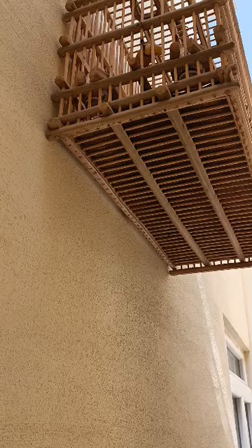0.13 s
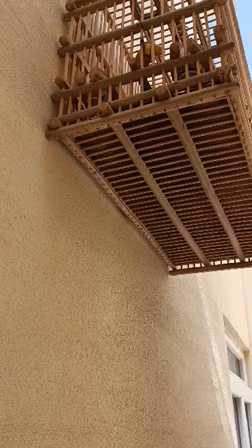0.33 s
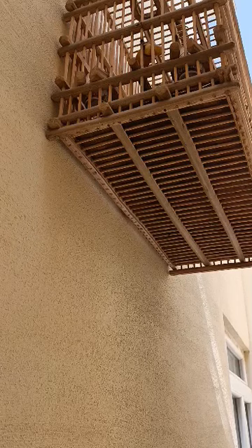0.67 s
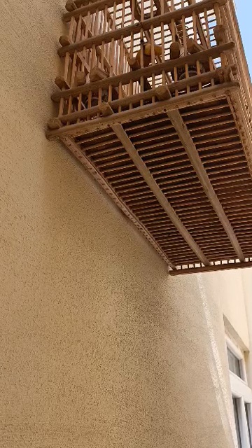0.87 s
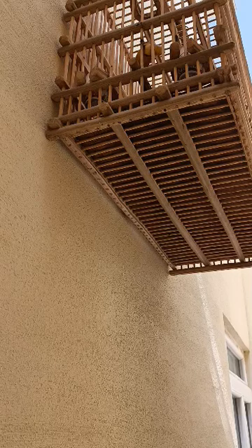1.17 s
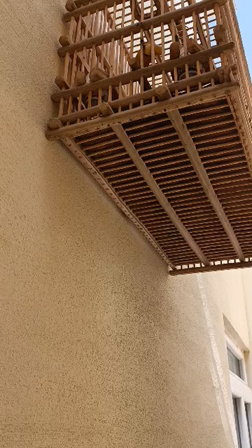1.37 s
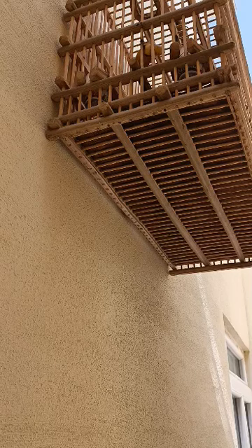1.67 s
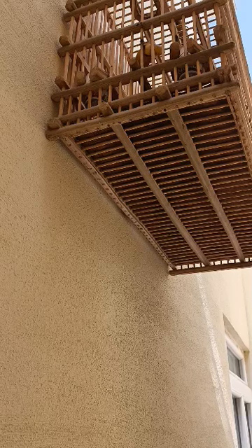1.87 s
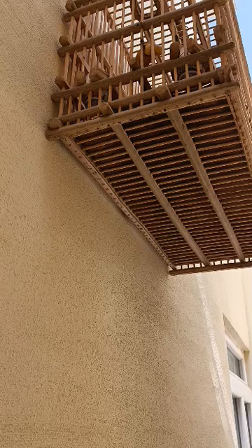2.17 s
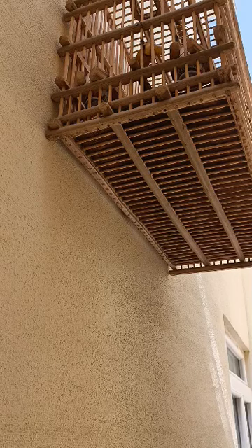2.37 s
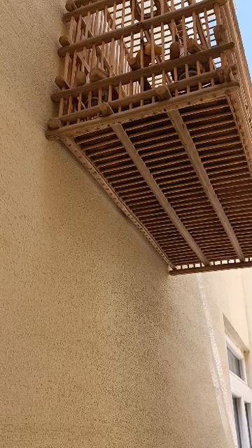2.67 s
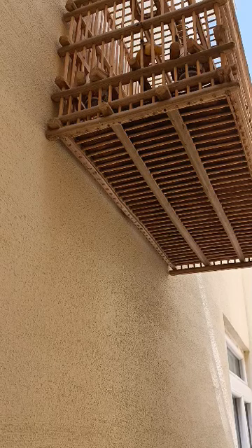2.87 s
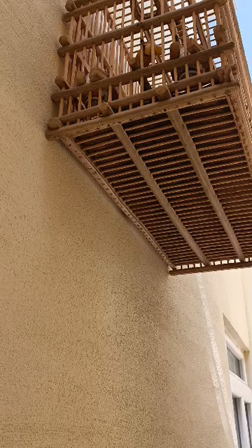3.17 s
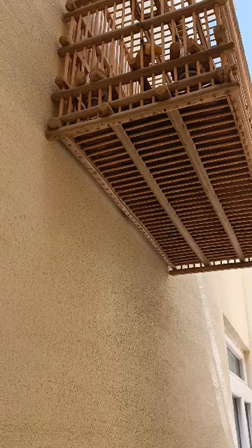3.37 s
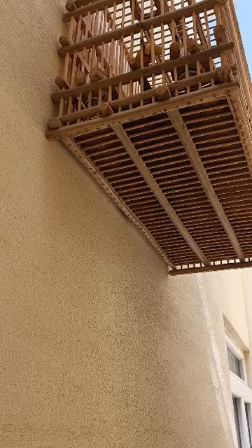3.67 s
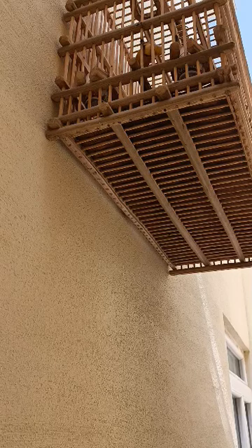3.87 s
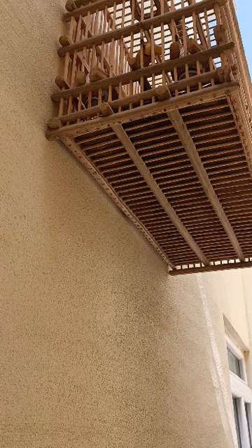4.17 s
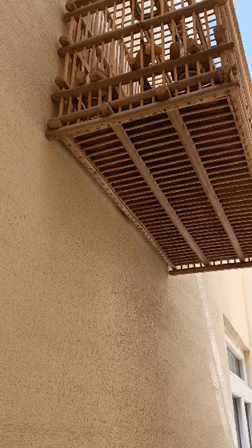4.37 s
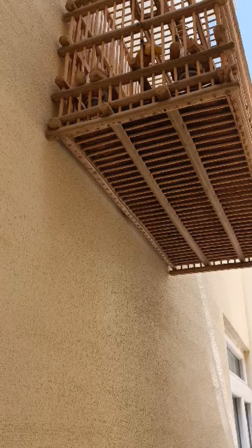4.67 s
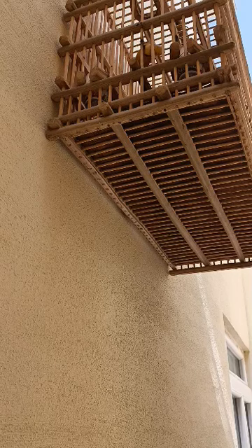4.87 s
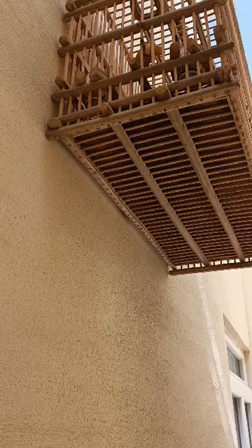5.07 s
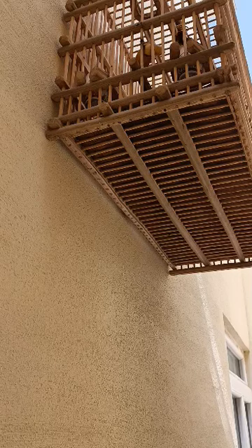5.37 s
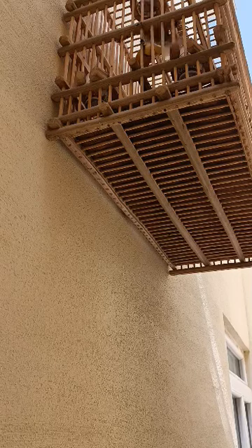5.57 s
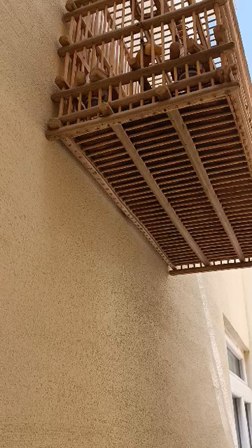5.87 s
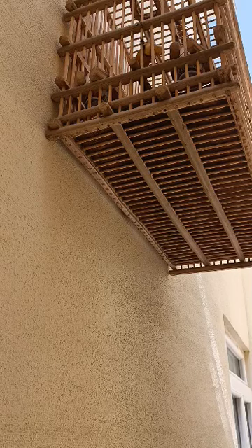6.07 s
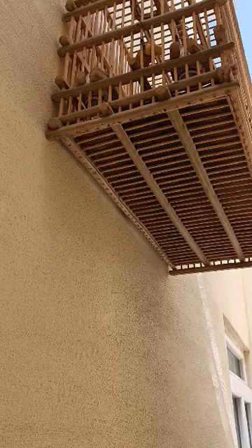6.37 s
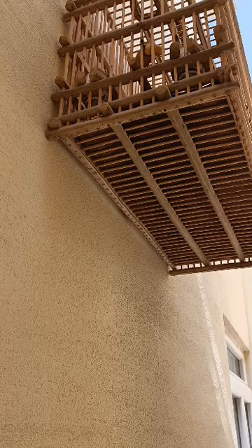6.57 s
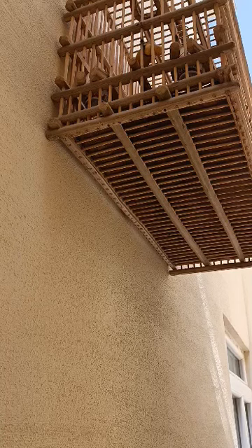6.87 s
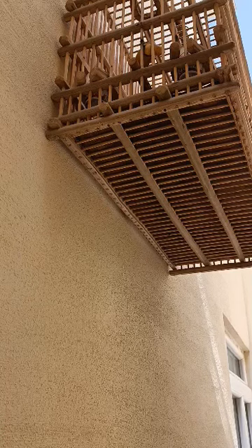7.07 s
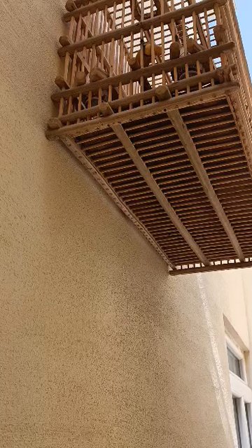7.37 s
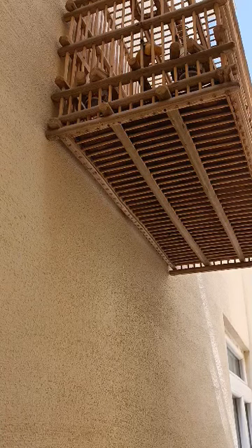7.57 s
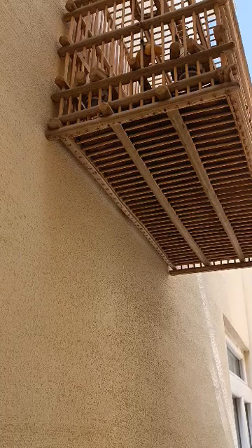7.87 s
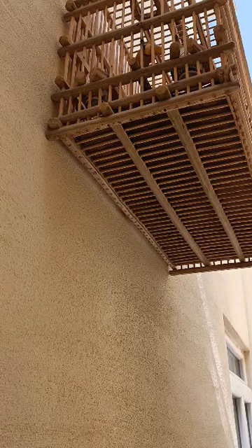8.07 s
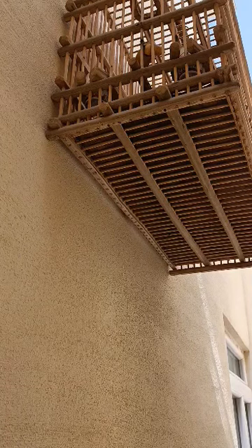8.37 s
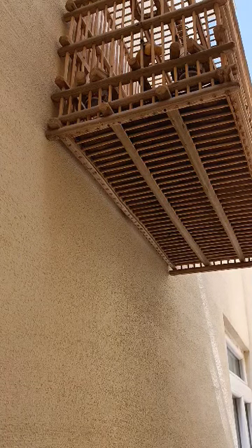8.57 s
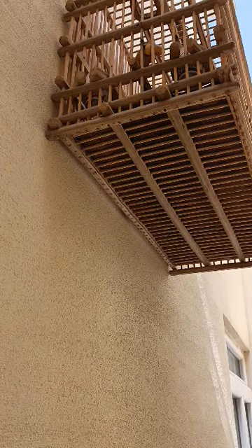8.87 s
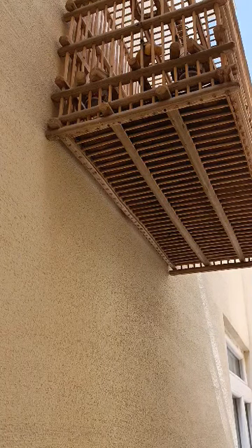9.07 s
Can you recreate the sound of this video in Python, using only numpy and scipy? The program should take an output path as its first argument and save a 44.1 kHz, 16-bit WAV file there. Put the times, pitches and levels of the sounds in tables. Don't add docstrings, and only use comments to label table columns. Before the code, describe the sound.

Outdoors in a hard-walled yard, a caged bird opens with short rasps and chips, then a nasal warble. After a pause come a rasp, a ringing cry and a loud whistled phrase repeated four times, fading. It hops, knocking the wooden cage, warbles again, whistles a liquid run, and ends with rasp, cry and phrase. Faint town rumble and a far engine hum continue; stereo, bird off to the right.

```python
import sys
import numpy as np
from scipy import signal
from scipy.fft import rfft, irfft
from scipy.io import wavfile
from scipy.ndimage import uniform_filter1d

SR = 44100
rng = np.random.default_rng(int(sys.argv[2]) if len(sys.argv) > 2 else 0)


def unload_wav(signal):
    wavfile.write(
        sys.argv[1],
        SR,
        np.round(np.clip(np.atleast_2d(signal).T, -1, 1) * 32767).astype(np.int16),
    )


def ratio(d):
    e = np.asarray(d, float) / 20
    return 10 ** e


N = 406602

# frequency in Hz, gain in dB.
THROAT = [(800, -10.5), (1300, -6), (1750, 4), (2050, 4.5), (2800, 10), (4300, -3), (5300, -30.5),
          (7000, -29.5), (10000, -64.5), (13000, -55.5)]


def at_hz(points, hz):
    table = np.array(points)
    return np.interp(np.log(hz), np.log(table[:, 0]), table[:, 1])


def in_time(rows):
    s, *columns = np.transpose(rows)
    return [np.interp(np.arange(N) / SR, s, column) for column in columns]


def rms_one(x):
    return x / np.sqrt(np.mean(x ** 2) + 1e-20)


def drift(rate, size=N, run_in=20000):
    r = np.exp(-2 * np.pi * rate / SR)
    noise = rng.standard_normal(size + int(run_in))
    return rms_one(signal.lfilter([1], [1, -2 * r, r * r], noise)[int(run_in):])


def band(x, low_hz, high_hz):
    corners = [low_hz, min(high_hz, .45 * SR)]
    return signal.sosfilt(signal.butter(2, corners, "band", fs=SR, output="sos"), x)


def add(out, s, note):
    i = round(s * SR)
    out[i:i + len(note)] += note[:max(N - i, 0)]


def breath(length, rise, swell_db):
    u = np.linspace(0, 1, max(round(length * SR), 8))
    edge = np.clip(np.minimum(u / np.clip(rise, .12, .6), (1 - u) / .18), 0, 1)
    return u, np.sin(np.pi / 2 * edge) ** 2 * ratio(swell_db * (u - 3.0))


def stack(hz, gain_db, count, flutter):
    phase = 2 * np.pi * np.cumsum(hz) / SR
    total = 0
    for k in range(1, count + 1):
        shake = 1 + flutter * (k - .7) * drift(540, size=len(hz), run_in=460)
        level = ratio(gain_db(k, k * hz)) * (k * hz < .4 * SR)
        total = total + level * shake * np.sin(k * phase + rng.uniform(0, 2 * np.pi))
    return total


def town():
    # frequency in Hz, density in dB per Hz.
    rumble = [(15, -45), (25, -22), (86, -4), (123, -5), (325, -14.5), (676, -16), (1300, -22.5),
              (1920, -26), (2630, -29), (3250, -43.5), (3610, -36.5), (7120, -36), (8330, -63.5),
              (9750, -44), (13000, -56)]
    # frequency in Hz, likeness from 0 to 1.
    likeness = [(30, 1), (130, 0.94), (280, 0.78), (610, 0.36), (1330, 0.43), (13000, 0.055)]
    out, edges = 0, 22 * 2 ** np.arange(0, 9.4, .5)
    white = rng.standard_normal((2, 2, N))
    for k, (low, high) in enumerate(zip(edges, edges[1:])):
        mid, side = band(white[k % 2], low, high)
        hz = np.sqrt(low * high)
        alike = np.clip(at_hz(likeness, hz), -1, 1)
        gain = ratio(at_hz(rumble, hz) + 1.5 * drift(2))
        out = out + gain * (np.sqrt(1 + alike) * mid + np.sqrt(1 - alike) * side * [[1], [-1]])
    return ratio(-58) * rms_one(out)


def engine():
    # time in seconds, frequency in Hz.
    firing_hz = [(0, 120.6), (1.5, 119.2), (3.5, 116.3), (5.4, 113.8), (6.6, 111), (9.22, 109.3)]
    # time in seconds, level in dB.
    firing_db = [(0.0, -64), (1.21, -56.5), (1.43, -57), (1.8, -63), (2.7, -57), (2.95, -60), (3.44, -55.5),
                 (4.13, -53.5), (4.8, -60), (5.11, -56.5), (6.03, -57.5), (6.24, -51.5), (6.96, -53),
                 (7.7, -62), (8.04, -67), (8.29, -57.5), (9.04, -52.5), (9.22, -48)]
    # middle in seconds, half width in seconds, peak in dB.
    octave_swells = [(0.361, 0.21, -63), (2.049, 0.38, -65), (2.83, 0.13, -67.5), (3.78, 0.075, -72)]
    (hz,), (tone_db,) = in_time(firing_hz), in_time(firing_db)
    t = np.arange(N) / SR
    octave = ratio(-75.5 + drift(3))
    for middle, half, db in octave_swells:
        octave = octave + ratio(db) * np.exp(-((t - middle) / half) ** 2)
    phase = 2 * np.pi * np.cumsum(hz * (1 + 0.0022 * drift(9.5))) / SR
    tone = ratio(tone_db + 0.66 * drift(6.6)) * np.sin(phase)
    return np.sqrt(2) * (tone + octave * np.sin(2 * phase))


def rasps():
    # start in seconds, length in seconds, start in Hz, top in Hz, level in dB.
    sweeps = [
        (0.08, 0.04, 842, 1420, -36),
        (0.537, 0.045, 897, 1206, -36),
        (2.435, 0.076, 795, 2034, -30.5),
        (7.146, 0.079, 790, 2025, -29.5),
        (8.128, 0.073, 801.4, 1768, -30),
    ]
    # frequency in Hz, gain in dB.
    open_beak = [(800, -14), (1700, -13), (2400, -5), (3300, 0), (4200, -3), (5100, -19), (7000, -30),
                 (13000, -40)]
    climb_hz_per_s = 21000
    broken_s, clear_s = 0.0423, .014
    break_hz, break_depth, break_wobble = 450, 0.76, 0.0834
    hiss_db, roar_db = -23.5, -9.5
    out = np.zeros(N)
    for s, length, start_hz, end_hz, db in sweeps:
        u, air = breath(length, rise=.4, swell_db=-2)
        broken = np.clip((u * length - max(length - broken_s, clear_s)) / .003, 0, 1)
        climb = np.minimum(start_hz + climb_hz_per_s * length * u, end_hz)
        hz = uniform_filter1d(climb, size=400, mode="nearest")
        hz = hz * (1 + break_wobble * broken * drift(break_hz, size=len(u), run_in=400))
        chaos = 1 + break_depth * broken * drift(break_hz, size=len(u), run_in=400)

        def gain_db(k, f):
            return at_hz(open_beak, f) - 13 * (k < 2) - 5 * max(k - 2, 0) * (1 - broken) - 2 * (k > 2)

        voice = stack(hz, gain_db, count=6, flutter=0.08)
        burst = ratio(hiss_db) * broken * rms_one(band(rng.standard_normal(len(u)), 5500, 11000))
        if length > broken_s + clear_s:
            roar = band(band(rng.standard_normal(len(u)), 1500, 5300), 1500, 5300)
            burst += ratio(roar_db) * broken * rms_one(roar)
        add(out, s, ratio(db) * air * (chaos * voice + burst))
    return out


def hiss(song):
    # low edge in Hz, high edge in Hz, level in dB.
    air_bands = [(1000, 4200, -47.5), (2740, 3700, -24.5), (9587, 10400, -38), (11000, 12000, -44)]
    loudness = np.sqrt(uniform_filter1d(song ** 2, size=120).clip(0))
    return loudness * sum(ratio(db) * rms_one(band(rng.standard_normal(N), a, b)) for a, b, db in air_bands)


def chips():
    # start in seconds, length in seconds, pitch in Hz, level in dB, beak resonance in Hz.
    calls = [
        (0.163, 0.02526, 685, -31, 3246),
        (0.627, 0.026, 692, -26.5, 3900),
        (6.057, 0.0286, 793, -32.5, 3730),
        (6.164, 0.033, 870, -29, 4040),
    ]
    out = np.zeros(N)
    for s, length, pitch_hz, db, beak_hz in calls:
        u, air = breath(length, rise=.42, swell_db=1.5)
        hz = pitch_hz * (1 + .03 * drift(200, size=len(u)))
        chop = 1 + 0.39 * np.sin(2 * np.pi * 170 * length * u)

        def gain_db(k, f):
            resonance_db = -np.log1p(((f / beak_hz - beak_hz / f) * 3) ** 2) * 5.34
            return resonance_db + 0.5 * at_hz(THROAT, f) - 5 * (k < 3)

        add(out, s, ratio(db) * air * chop * stack(hz, gain_db, count=16, flutter=0.35))
    return out


def warble():
    # start in seconds, length in seconds, top in Hz, level in dB.
    climbs = [(1.085, 0.024, 1613, -29.5), (1.268, 0.029, 1553, -29.5), (1.552, 0.031, 1492, -29.5),
              (1.689, 0.019, 1348, -31.5), (5.436, 0.034, 1557, -36), (5.602, .035, 1519, -33.5),
              (5.693, 0.034, 1560, -33.5), (6.293, 0.022, 1563, -29.5), (6.577, 0.022, 1375, -33.5),
              (6.779, 0.036, 1554, -30), (6.923, 0.028, 1495, -29.5)]
    # start in seconds, length in seconds, start in Hz, level in dB.
    sags = [(1.432, 0.027, 1412, -29), (6.579, 0.038, 1306, -33.5), (6.701, 0.035, 1154, -35.5)]
    # start in seconds, length in seconds, start in Hz, end in Hz, level in dB.
    glides = [(0.756, .04, 1148, 1639, -37.5), (0.84, .036, 1160, 1840, -28.5),
              (0.863, 0.024, 1823, 1395, -29.5), (0.924, 0.018, 1130, 1467, -34),
              (0.971, 0.047, 1250, 1122, -34.5), (1.005, .028, 1180, 1312, -31),
              (1.028, 0.033, 1374, 1005, -36), (1.156, .05, 1335, 1137, -32),
              (1.16, 0.044, 1136, 1248, -33), (1.339, 0.043, 1000, 1116, -35.5),
              (1.343, 0.013, 1144, 1520, -30.5), (1.377, 0.027, 1146, 1596, -30.5),
              (1.766, 0.025, 905, 1101, -35), (1.997, 0.014, 1170, 1320, -30.5),
              (5.787, 0.038, 1416, 1272, -34), (5.892, 0.0142, 1406, 1158, -32),
              (5.912, 0.011, 1218, 1352, -32), (5.99, 0.016, 1322, 1048, -35),
              (5.998, 0.026, 1090, 1253, -36), (6.129, 0.029, 1164, 1555, -33.5),
              (6.389, 0.036, 874, 1304, -33), (6.494, 0.0185, 1047, 1203, -34),
              (6.51, 0.022, 950, 917.7, -37)]
    # start in seconds, length in seconds, start in Hz, end in Hz, level in dB.
    pure = [(1.856, 0.011, 1216, 1074, -33), (1.862, 0.021, 1435, 1533, -25),
            (1.888, 0.03, 1519, 1462, -28), (1.91, 0.017, 1292, 1231, -32), (2.004, 0.031, 1460, 1524, -30),
            (6.312, 0.015, 1513, 1540, -41), (6.637, 0.018, 1505, 1446, -27),
            (6.828, 0.02, 1510, 1316, -28)]
    rest_hz, sag_to = 1016, .86
    even_db, pure_loss_db = 0, -5
    rough_wobble, clear_wobble = .02, .004
    glide_share = .75
    notes = [(s, length, rest_hz, hz, db, even_db, clear_wobble) for s, length, hz, db in climbs]
    notes += [(s, length, hz, sag_to * hz, db, even_db, rough_wobble) for s, length, hz, db in sags]
    notes += [(*row, even_db, rough_wobble) for row in glides]
    notes += [(*row, pure_loss_db, clear_wobble) for row in pure]
    out = np.zeros(N)
    for s, length, start_hz, end_hz, db, pure_db, wobble in notes:
        tilt_db = 1.1 + 1.1347 * (db + 32) - 0.5 * (s > 4)
        u, air = breath(length, rise=0.18, swell_db=4)
        left = np.clip(1 - u / glide_share, 0, 1) ** 1.3
        hz = (end_hz + (start_hz - end_hz) * left) * (1 + wobble * drift(300, size=len(u)))

        def gain_db(k, f):
            return at_hz(THROAT, f) + tilt_db * (k - 2) + pure_db * abs(k - 2)

        add(out, s, ratio(db) * air * stack(hz, gain_db, count=9, flutter=0.22))
    return out


def cries():
    # start in seconds, level in dB.
    calls = [
        (2.659, -21),
        (8.351, -20),
    ]
    # time in seconds, pitch in Hz, level in dB.
    course = [
        (0, 2260, -17),
        (.01, 3044, -2),
        (.03, 3246, 1.5),
        (0.037, 4176, -1),
        (.047, 3488, 3.5),
        (0.066, 3350, -3),
        (.092, 3162, -3.5),
        (.1, 3033, -35),
    ]
    wobble, flutter = .035, 0.57
    grit_db, grit_fade_s = -4.5, 0.01825
    overtones_db = (0, -27.5, -34, -53.5)
    at, pitch_hz, shape_db = np.transpose(course)
    t = np.arange(round(at[-1] * SR)) / SR
    out = np.zeros(N)
    for s, db in calls:
        hz = np.interp(t, at, pitch_hz) * (1 + wobble * drift(400, size=len(t), run_in=430))
        voice = stack(hz, lambda k, f: overtones_db[k - 1], count=4, flutter=flutter)
        pulses = rng.standard_normal(len(t)) * (rng.random(len(t)) < 900 / SR) * (t > .008)
        grit = ratio(grit_db) * np.exp(-t / grit_fade_s) * rms_one(band(pulses, 1830, 4000))
        air = ratio(db + np.interp(t, at, shape_db)) * np.clip(t / .004, 0, 1)
        add(out, s, air * (voice + grit))
    return out


def whistles():
    # seconds after its start, start in Hz, middle in Hz, end in Hz, level in dB.
    phrase_notes = [(-.002, 2780, 2535, 2503, -14), (0.069, 2335, 1715, 2650, -32.5),
                    (0.08, 2615, 2526, 2397, -14.5), (0.104, 2502, 2411, 2447, -16),
                    (0.228, 1956, 1618, 1656, -28), (0.264, 1875, 2085, 2080, -19),
                    (.312, 1840, 2067, 2227, -35), (0.359, 1681, 1713, 1648, -25)]
    # seconds after its start, start in Hz, middle in Hz, end in Hz, level in dB.
    phrase_flicks = [(.026, 2314, 2077, 2680, -24.5), (0.075, 3220, 3430, 3585, -27),
                     (0.171, 1510, 1813, 2240, -34.5), (0.22, 1630, 1878, 2022, -24),
                     (.255, 1400, 1600, 1950, -35.5), (.292, 2127, 1735, 1267, -29.5),
                     (.384, 1615, 1702, 1600, -27.5)]
    # start in seconds, slowing (1 = none), pitch factor, gain of opening in dB, of the rest in dB.
    repeats = [
        (2.844, 1, 1, 0, 0.5),
        (3.277, 1.062, 0.996, -2, -1.5),
        (3.748, 1.073, 1, -2.5, -4.5),
        (4.231, 1.067, 0.98, -4.5, -5),
        (8.553, 1.01, 1.001, -2.5, 0.5),
        (8.99, 1.035, 0.99, -1, -3.5),
    ]
    # start in seconds, start in Hz, middle in Hz, end in Hz, level in dB.
    run = [(7.412, 2000, 1941, 1820, -21), (7.433, 1890, 1712, 2120, -24.5), (7.521, 2590, 1644, 1680, -26),
           (7.569, 1732, 2230, 1980, -17.5), (7.584, 1770, 2000, 2340, -24), (7.603, 2590, 2473, 2470, -16),
           (7.722, 1687, 2004, 1261, -24), (7.779, 2585, 2373, 2370, -19), (7.809, 1488, 1854, 1790, -22.5)]
    # start in seconds, start in Hz, middle in Hz, end in Hz, level in dB.
    run_flicks = [(7.711, 2460, 2174, 1690, -19), (7.838, 1727, 2230, 2668, -20)]
    # multiple of the pitch, level in dB.
    overtones = [(2, -30.5), (3, -39), (4, -38), (5, -61)]
    notes = [(0.0258, *row) for row in run] + [(0.021075, *row) for row in run_flicks]
    phrase = [(0.0287, *row) for row in phrase_notes] + [(.013, *row) for row in phrase_flicks]
    for s, slowing, factor, *gains_db in repeats:
        for length, t, a, b, c, db in phrase:
            gain = gains_db[int(t > .06)]
            notes.append((length * slowing, s + t * slowing, a * factor, b * factor, c * factor, db + gain))
    level = dict([(1, 0)] + list(overtones))
    out = np.zeros(N)
    for length, s, start_hz, middle_hz, end_hz, db in notes:
        u, air = breath(length, rise=0.25, swell_db=1.0)
        bend = 4 * u * (1 - u) * (middle_hz - (start_hz + end_hz) / 2)
        hz = start_hz + (end_hz - start_hz) * u + bend
        add(out, s, ratio(db) * air * stack(hz, lambda k, f: level[k], count=5, flutter=0.24))
    return out


def cage():
    # time in seconds, click in dB, thud in dB.
    hops = [(5.276, -76.5, -71), (5.3942, -53, -71), (5.4073, -61, -59), (5.4303, -72, -72),
            (5.585, -68, -71), (5.617, -54, -52), (5.686, -43, -38.5), (5.6995, -47.5, -39),
            (5.8966, -63.5, -54), (6.0555, -79, -68.5)]
    # start in seconds, length in seconds, rustle in dB, rattle in dB.
    shakes = [
        (5.26, 0.31, -62, -60),
        (5.583, 0.12, -57.5, -61),
        (5.678, 0.37, -57, -45.5),
    ]
    # frequency in Hz, level in dB, decay time (60 dB) in seconds.
    modes = [(194, -29, 0.1), (294, -8.5, 0.0293), (454, -14, 0.055), (577, 10.5, 0.0068),
             (790, -15, 0.013)]
    rise_s, fade_db_per_s = 0.031, 10
    ticks, thuds = np.zeros(N), np.full(N, 1e-18)
    for s, click_db, thud_db in hops:
        add(ticks, s, ratio(click_db + 20.0) * rng.standard_normal(260) * np.exp(-np.arange(260) / 50))
        thuds[round(s * SR)] = ratio(thud_db - 6.5)
    rustle, rattle = np.zeros((2, N))
    for s, length, rustle_db, rattle_db in shakes:
        t = np.arange(round(length * SR)) / SR
        shake = np.clip(np.minimum(t, length - t) / rise_s, 0, 1) * ratio(-fade_db_per_s * t)
        add(rustle, s, ratio(rustle_db) * shake)
        add(rattle, s, ratio(rattle_db) * shake)
    strikes = rng.random(N) < 2500 / SR
    grains = rms_one(rng.standard_normal(N) * ratio(4.1 * rng.exponential(1, N)) * strikes)
    thuds += ratio(-34.5) * rattle * grains
    out = band(ticks + ratio(3.5) * rustle * grains, 1200, 8000)
    for hz, db, t60 in modes:
        r, w = ratio(-60 / (t60 * SR)), 2 * np.pi * hz / SR
        out += ratio(db) * signal.lfilter([0, np.sin(w)], [1, -2 * r * np.cos(w), r * r], thuds)
    return out


def yard(x):
    # frequency in Hz, decay time (60 dB) in seconds.
    decay = [(500, 0.55), (1700, 0.47), (3000, 0.361), (5000, 0.77), (12000, 0.017)]
    # frequency in Hz, gain in dB.
    colour = [(500, -2), (1200, 7), (1700, 1), (2100, 0.5), (2500, 0.5), (3000, -1), (3500, -4.5),
              (4500, -1.5), (9000, -3)]
    pan_db, right_lag_s = -8.5, 0.00013
    gap_s, tail_db = .004, -2.0
    shared = 0.067
    t = np.arange(round(.7 * SR)) / SR
    sparse = rng.standard_normal((2, len(t))) * (rng.random((2, len(t))) < .01 + 1.5 * t)
    sparse /= np.sqrt(np.minimum(0.0031 + 8.6 * t, 1))
    edges = 150 * 2 ** np.arange(0, 7.1)
    tail = 0
    for a, b in zip(edges, edges[1:]):
        tail = tail + band(sparse, a, b) * ratio(-60 * t / at_hz(decay, np.sqrt(a * b)))
    tail *= np.clip(t / gap_s - .5, 0, 1)
    spectrum = rfft(tail)
    broad = np.sqrt(uniform_filter1d(abs(spectrum) ** 2, size=90))
    hz = np.arange(1, spectrum.shape[1] + 1) * SR / len(t)
    tail = irfft(spectrum / broad * ratio(at_hz(colour, hz)), len(t)) * (t < .6)
    tail = tail + shared * tail[::-1]
    tail *= ratio(tail_db) / np.sqrt(np.sum(tail ** 2, axis=1, keepdims=True))
    late = np.interp(np.arange(N) - right_lag_s * SR, np.arange(N), x)
    direct = np.array([x * ratio(pan_db / 2), late * ratio(-pan_db / 2)])
    return direct + signal.fftconvolve(x[None], tail, axes=1)[:, :N]


def scene():
    song = warble() + rasps() + cries() + chips() + whistles()
    return yard(song + hiss(song) + cage()) + engine() + town()


def low_pass(x):
    return signal.sosfilt(signal.butter(12, 13350, fs=SR, output="sos"), x)


def record(dry):
    # centre in Hz, width in Hz, depth in dB.
    dips = [(5980, 710, -2), (8480, 1000, -3)]
    hz = np.arange(N // 2 + 1) * SR / N
    dips_db = sum(db * np.exp(-((hz - dip_hz) / width_hz) ** 2) for dip_hz, width_hz, db in dips)
    mix = irfft(rfft(dry) * ratio(dips_db), N)
    return low_pass(mix)


dry = scene()
out = record(dry)
unload_wav(out)
```